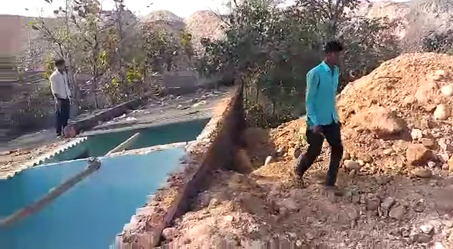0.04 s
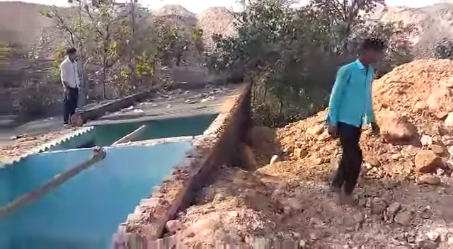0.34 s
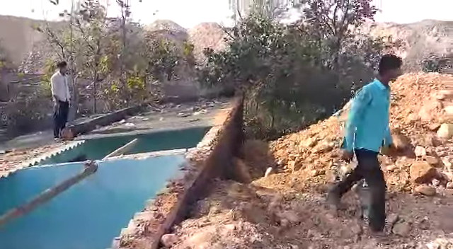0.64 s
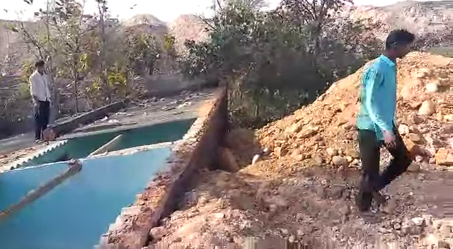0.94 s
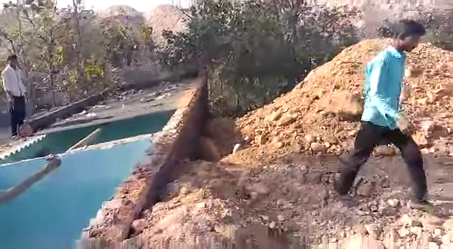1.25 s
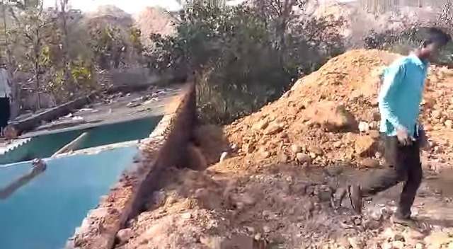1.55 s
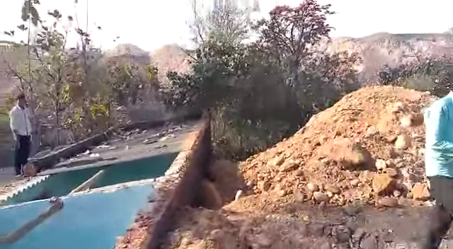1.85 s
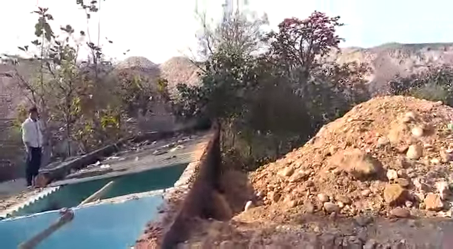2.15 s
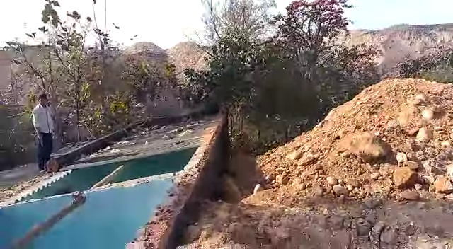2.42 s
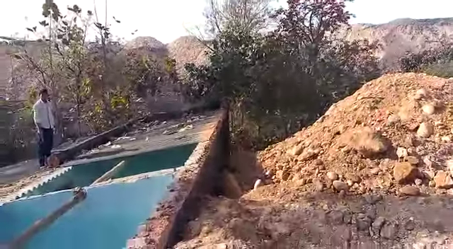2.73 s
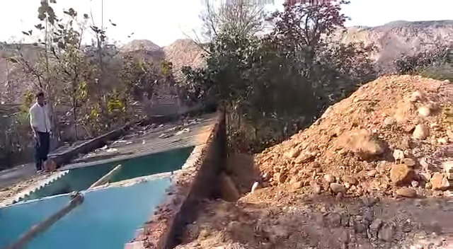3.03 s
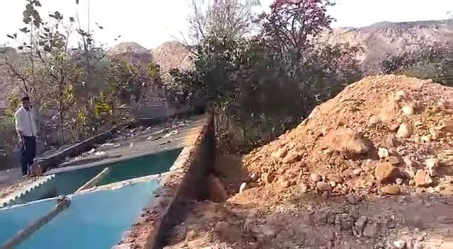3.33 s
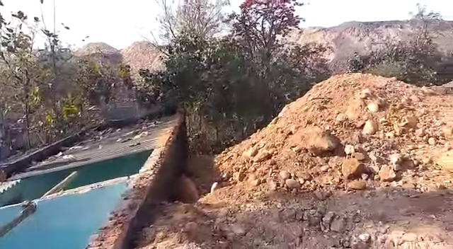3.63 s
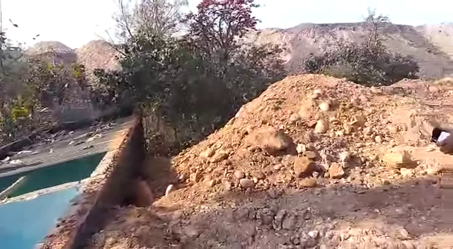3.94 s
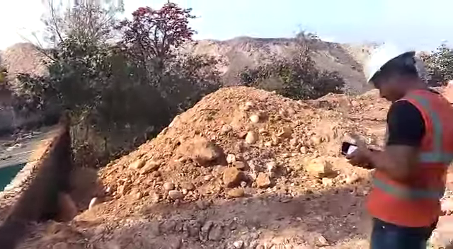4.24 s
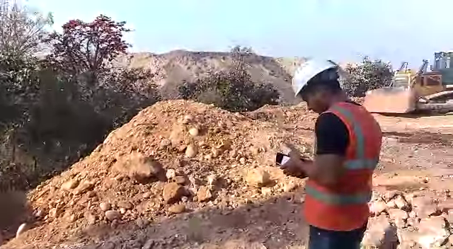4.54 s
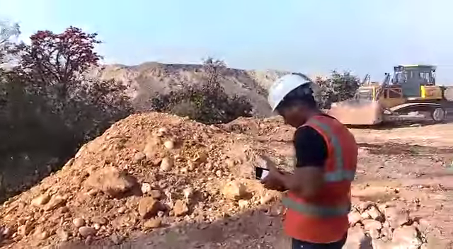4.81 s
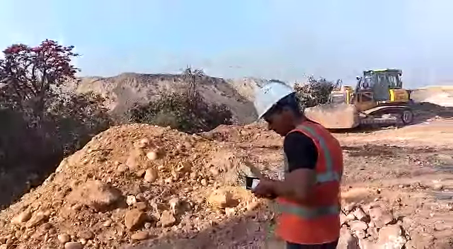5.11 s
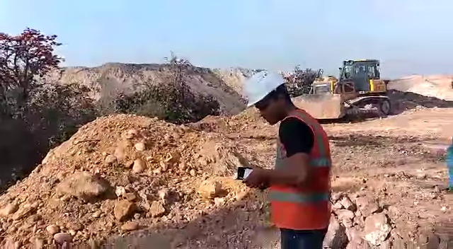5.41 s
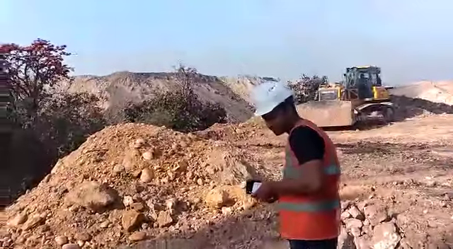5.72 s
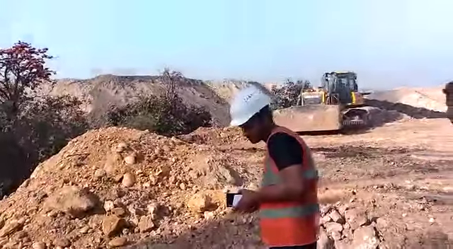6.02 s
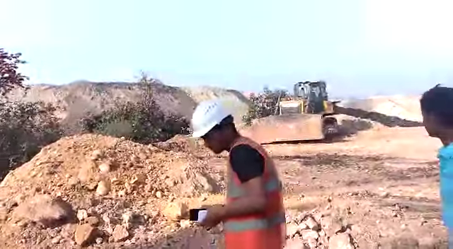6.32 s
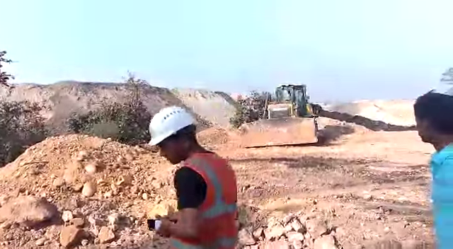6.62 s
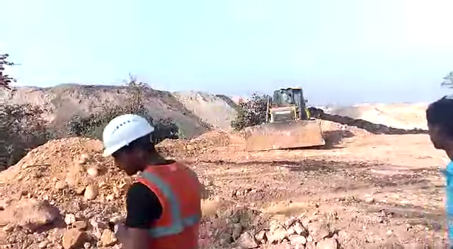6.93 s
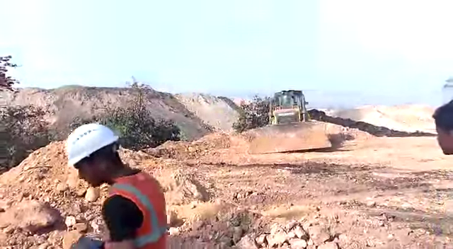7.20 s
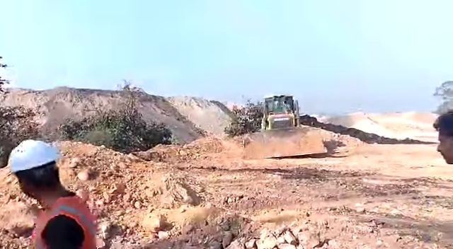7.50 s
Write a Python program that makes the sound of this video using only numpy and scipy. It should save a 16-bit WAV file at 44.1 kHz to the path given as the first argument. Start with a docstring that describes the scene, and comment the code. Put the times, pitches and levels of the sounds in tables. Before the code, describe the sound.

Dry steel tracks squeal and scrape over a distant bulldozer's low diesel rumble, which sags, rises with a thin whine, then slows.

```python
"""A bulldozer works some way off in an open mine. At first its diesel sags while dry track steel squeals
and scrapes. Near 3 s the engine revs up, the turbo whine climbs and soil crunches. From about 4 s the
engine labours, the air intake hisses and grit runs off the tracks; a hand-held phone with two unlike
microphones turns towards the machine, hearing it directly and off the ground. Around 6 s the steel
scrapes and chirps again, a breeze brushes the phone, and the engine slows."""
import sys
import numpy as np
from scipy import signal
from scipy.fft import rfft, irfft, next_fast_len
from scipy.io import wavfile
from scipy.ndimage import uniform_filter1d, map_coordinates

SR = 44100
rng = np.random.default_rng(int(sys.argv[2]) if len(sys.argv) > 2 else 0)


def put_to_file(sound):
    """Save the sound as 16-bit audio at rate SR, in the file named by the first command-line argument."""
    columns = np.atleast_2d(sound).T  # one column per channel
    safe = np.clip(columns, -1, 1)
    whole_steps = np.round(safe * 32767)
    wavfile.write(sys.argv[1], SR, whole_steps.astype(np.int16))


N = 342216
TIME = np.arange(N) / SR

# how often the cylinders fire: t/s, f/Hz
FIRING_RATE = [(0, 90.8), (.95, 80.4), (1.5, 76.1), (2.55, 77.8), (2.75, 85.6), (3, 100.7), (3.25, 102.4),
               (3.9, 99.53), (4.5, 94.7), (5.1, 89.08), (5.6, 89.73), (6, 88.8), (6.9, 81.2), (7.76, 81.9)]
# how hard the engine works: t/s, bass level/dB, midrange level/dB
ENGINE_LOAD = [(0.0, -42.5, -46.5), (0.69, -42.5, -48.5), (1.04, -40, -46), (2.29, -46, -49.5),
               (2.68, -46, -47.5), (2.94, -41, -42.5), (4.19, -37.5, -45.5), (4.65, -38.5, -45.5),
               (5.75, -39, -45.5), (6.33, -39, -48), (6.79, -43, -48), (7.76, -42.5, -43.5)]
# exhaust tones: multiple of the firing rate, level at low speed/dB, level at full speed/dB
EXHAUST_TONES = [(1, -4, -3), (2, -17.5, -7), (3, -17, -6), (6, -11.5, -10), (7, -25, -9.5),
                 (8, -18, -12.5), (9, -12.5, -13), (12, -10.5, -35)]
# where the exhaust pipe rings: f/Hz, width/Hz, boost/dB
PIPE_RINGS = [(554.5, 21, 1.5), (1064, 24, 4)]
# tone colour of the engine's rumble: f/Hz, level/dB
RUMBLE_COLOUR = [(12, -17), (25, -8), (45, -9), (65, -8), (100, -1), (135, -2.5), (165, -7.5), (210, -5.5),
                 (290, -8.5), (400, -6.5), (650, -43), (1200, -74)]
# tone colour of the clatter of burning fuel: f/Hz, level/dB
CLATTER_COLOUR = [(250, -3.5), (450, 2), (600, 1), (800, 3), (1100, -5), (1450, -13.5), (1950, -5.5),
                  (2400, -1), (2800, -12.5), (3300, -22), (4500, -6.5), (8000, -20.5)]
# a second drone that sinks, fades and returns: t/s, f/Hz, level/dB
LOW_DRONE = [(0, 151.7, -47), (.5, 148.3, -48), (1, 137.6, -53), (2.1, 126.6, -69.5), (2.8, 143.1, -47.5),
             (4.6, 140.5, -59.5), (5.9, 145.2, -53.5), (7.1, 130.4, -55.5)]
# gear hum as the machine gets moving: t/s, f/Hz, level/dB
GEAR_HUM = [(3.4, 209.5, -69), (3.9, 227.8, -47), (4.4, 263.7, -47), (4.9, 268.1, -41.5),
            (5.8, 254.3, -55.5), (7.3, 269.7, -62), (7.7, 277, -46.5)]
# tone colour of the air intake's hiss: f/Hz, level/dB
INTAKE_COLOUR = [(1000, -4), (2000, -2.5), (3400, -8), (4000, -5.5), (4600, -5.5), (5400, -7),
                 (6200, -12.5), (7300, -7.5), (8400, -0.5), (9100, 5), (10200, -3), (11500, -13.5),
                 (13000, -15.5), (14200, -24)]
# strength of that hiss: t/s, level/dB
INTAKE_LEVEL = [(0, -46), (2.3, -48), (3, -44.5), (4, -43.5), (4.4, -39.5), (5.3, -38), (6.15, -42.5),
                (6.6, -47.5), (7.76, -49.5)]
# pitch of the turbo's blades: t/s, f/Hz
TURBO_PITCH = [(0.3, 14000), (1.1, 11900), (1.6, 11100), (2.45, 9130), (2.7, 9970), (3.05, 12300),
               (3.7, 14690), (5.8, 14760), (6.65, 11790), (7, 10930), (7.35, 10750), (7.76, 11230)]
# whistle of the drive: t/s, f/Hz, level/dB
DRIVE_WHISTLE = [(3.1, 9495, -81), (3.45, 9800, -54), (3.8, 10360, -55), (4.3, 10830, -50),
                 (4.75, 10940, -41), (5.1, 10590, -45), (6, 9910, -43.5), (6.35, 8960, -53),
                 (6.6, 9090, -80)]
# track squeals: start t/s, length/s, f/Hz, glide/Hz, level/dB, fade/dB, octave level/dB, roughness 0-1
TRACK_SQUEALS = [(-.02, 0.19, 4570, -5, -24.5, 3, -34.5, 0.46),
                 (0.233, 0.054, 4578, 9, -19.5, -1.5, -28.5, 0.36),
                 (0.293, 0.12, 4602, -33, -20.5, 7.5, -33, 0.6),
                 (0.486, 0.053, 4650, 14, -25, 5.5, -40.5, 0.2),
                 (0.882, 0.069, 4760, -15, -33.5, 6.5, -48, 0.27),
                 (1.011, 0.11, 4613, 28, -25.5, 13.5, -31.5, 0.9),
                 (1.201, 0.073, 4610, 8, -15.5, 16.5, -31, 0.4),
                 (1.284, 0.043, 4595, -27, -27, 7, -39, 0.8),
                 (1.384, 0.037, 4534, 50, -21.5, 13, -22.5, 0.9),
                 (1.422, 0.045, 4586, -48, -24.5, 7.5, -38, 0.86),
                 (1.501, 0.023, 4530, 22, -34, -1, -45, 0.77), (1.559, 0.018, 4604, 3, -32, -1, -38, 0.8),
                 (1.587, 0.077, 4604, 1, -18, 16.5, -35.5, 0.6),
                 (1.779, 0.034, 4596, 14, -34.5, -14, -32, 0.4), (1.821, 0.11, 4580, -44, -30, 1.5, -33, 0)]
# short squeaks of steel: start t/s, length/s, f/Hz, level/dB, place of the peak 0-1
STEEL_CHIRPS = [(.35, 0.25, 2497, -46.5, 0.26), (1.515, 0.42, 2490, -43, 0.31),
                (1.833, 0.064, 4660, -36, .45), (5.464, 0.11, 5364, -27.5, 0.73),
                (5.469, 0.069, 3634, -40, 0.6), (5.805, 0.125, 4995, -31, 0.2),
                (5.816, 0.14, 4620, -46, .3), (5.784, .1, 4100, -41, .45), (5.926, 0.036, 5003, -39, .35),
                (6.19, 0.079, 7260, -48, 0.47), (6.197, .035, 3450, -46, .4), (6.47, 0.046, 3260, -50, .4),
                (6.568, .04, 3290, -51, .4)]
# gritty scrapes: middle t/s, level/dB, half length/s
GRIT_SCRAPES = [(0.093, -36.5, .018), (0.33, -39, 0.034), (0.549, -37.5, 0.024), (0.73, -34.5, 0.028),
                (0.92, -35.5, 0.034), (1.096, -33, 0.018), (1.257, -45, 0.033), (1.405, -49, 0.02),
                (3.583, -35.5, 0.015), (3.706, -41, 0.019), (5.228, -23.5, 0.0083), (5.395, -28, 0.013),
                (5.43, -31, 0.014), (5.48, -23.5, 0.023), (5.615, -29, 0.011), (5.938, -29.5, 0.007),
                (6.163, -31.5, 0.011), (6.48, -40, 0.0053), (7.49, -44.5, 0.052)]
# stones snapping against steel: t/s, f/Hz, level/dB
STONE_SNAPS = [(.688, 8300, -47), (0.753, 9500, -30), (0.795, 11500, -39), (.945, 9600, -30),
               (1.539, 6860, -39), (3.573, 8300, -34.5), (5.724, 10340, -38), (6.476, 8190, -38),
               (6.583, 13500, -38)]
# where the track steel rings: f/Hz, width/Hz, level/dB
STEEL_RINGS = [(5730, 27, -4.5), (7120, 61, -15.5), (8550, 22, 9), (8650, 61, 4), (8600, 49, -3),
               (9300, 52, 3), (9630, 28, 8), (9900, 83, -1.5), (12900, 130, -29)]
# crunches and knocks in the soil: peak t/s, level/dB, rise/s, decay/s, centre f/Hz
SOIL_CRUNCHES = [(1.222, -33.5, 0.0083, 0.0081, 2290), (2.87, -38, 0.03, 0.077, 1970),
                 (3.752, -27.5, 0.016, 0.039, 3100), (4.32, -39.5, 0.017, 0.014, 2620),
                 (5.972, -36.5, 0.0014, 0.013, 4020), (6.316, -32.5, 0.0009, 0.0025, 4980)]
# tone colour of grit running off the tracks: f/Hz, level/dB
FALLING_GRIT_COLOUR = [(3000, -16), (6000, 3), (8500, -6), (11000, 9), (14000, -5)]
# strength of that grit: t/s, level/dB
FALLING_GRIT_LEVEL = [(3.7, -68), (4.4, -44), (5.4, -48), (6.3, -57), (7, -74), (7.76, -68)]
# breeze on the microphones: t/s, level/dB
BREEZE_LEVEL = [(0, -72), (2.3, -55), (3, -57), (4.3, -78), (5.4, -64), (6.2, -39.5), (6.7, -50.5),
                (7.76, -56)]
# the phone's turn: t/s, right lag/samples, ground echo delay/ms, right hiss boost/dB, echo level/dB
PHONE_TURN = [(0, 19.7, 2.3, 7.5, -12.5), (2.3, 19.3, 1.19, 6, -3), (3.8, 17.6, 1.203, 6.5, -6.5),
              (4.25, 15.1, 1.44, 2.5, -5), (4.75, 10.23, 1.66, 0.5, -0.5), (5.5, 10, 1.85, 1, -1.5),
              (6.25, 5.2, 1.702, -1, -4.5), (6.75, 3.86, 1.795, 3.5, -4), (7.76, 4.22, 1.79, 1.5, -5.5)]
# tone colour of the right microphone against the left: f/Hz, level/dB
RIGHT_MIC_COLOUR = [(100, 0.5), (700, -0.5), (1200, 3.5), (1800, -6), (2400, -9), (3300, -5), (4500, -7.5),
                    (6000, -2), (7700, -4), (9200, -14.5), (11000, -16), (14000, -13.5)]

SCRAPE_HZ = 9100  # centre of the noise of grit on steel


def diesel(knock=0.27, note_db=-4, rumble_db=-3.5, clatter_db=3):
    """Exhaust, pump and hums sound over rumble and clatter that pulse each time a cylinder fires."""
    hz, = curves(FIRING_RATE)
    bass_db, middle_db = curves(ENGINE_LOAD)
    phase = phase_of(hz * (1 + 0.00349 * wander(9)))
    pump_tone, growl = pump(hz, phase)
    note = exhaust(hz, phase, bass_db + note_db)
    tones = note + growl + np.sqrt(2) * (pump_tone + hum(LOW_DRONE) + hum(GEAR_HUM))
    pulse = np.exp(knock * np.cos(phase))
    rumble = machine_noise(RUMBLE_COLOUR, scatter_db=-24, pulse=pulse) * gain(bass_db + rumble_db)
    clatter = machine_noise(CLATTER_COLOUR, scatter_db=-13, pulse=pulse)
    clatter *= gain(middle_db + clatter_db + 1.22 * wander(14))
    return ground_echo(two_mics(tones) + rumble + exhaust_pipe(clatter))


def exhaust(hz, phase, note_db, flutter_db=2, lumpy_db=-17):
    """The firings make a note that brightens with speed; six unequal cylinders add weak tones between."""
    speed = np.clip((hz - hz.min()) / np.ptp(hz), 0, 1)
    pickup = np.maximum(np.gradient(uniform_filter1d(hz, size=16000)), 0)
    surge_db = 6 * pickup / pickup.max()  # low tones swell while the engine speeds up
    note = 0
    for k, slow_db, fast_db in EXHAUST_TONES:
        pipe_db = sum(db * np.exp(-((k * hz - centre) / width) ** 2) for centre, width, db in PIPE_RINGS)
        level_db = slow_db + (fast_db - slow_db) * speed + pipe_db + surge_db / k
        note += gain(level_db + flutter_db * wander(10)) * np.sin(k * (phase + 0.033 * wander(22)))
    lumps = sum(wander(6) * np.sin(k / 6 * phase + rng.uniform(0, 2 * np.pi))
                for k in range(3, 18) if k % 6)
    return np.sqrt(2) * gain(note_db) * (note + gain(lumpy_db) * lumps)


def exhaust_pipe(x, ring_db=-4):
    """The noise of burning fuel makes the exhaust pipe ring."""
    return x + gain(ring_db) * sum(band(x, hz, width) for hz, width, _ in PIPE_RINGS)


def pump(firing_hz, phase, fade_db_per_hz=0.9, growl_db=-6):
    """The hydraulic pump's tone and rough growl, both fading as the engine slows."""
    strokes_per_firing = 10 / 3
    db = -44 - fade_db_per_hz * (firing_hz.max() - firing_hz) + 2 * wander(8.2)
    tone = gain(db) * np.sin(phase * strokes_per_firing)
    return tone, whine(firing_hz * strokes_per_firing, db + growl_db, width_hz=140)


def hum(table, flutter_db=2, wobble=0.00801):
    """A low tone that wavers in level and pitch."""
    hz, db = curves(table)
    return gain(db + flutter_db * wander(9)) * np.sin(phase_of(hz * (1 + wobble * wander(12))))


def intake():
    """Air rushing into the engine hisses, with a fine grain in it."""
    hiss = machine_noise(INTAKE_COLOUR, scatter_db=-0.5)
    hiss += gain(-3.5) * unit(colour(grit(), INTAKE_COLOUR))
    _, _, right_db, _ = curves(PHONE_TURN)
    return hiss * gain(curves(INTAKE_LEVEL)[0] + 1.4 * wander(21.055)) * gain(np.outer([0, 1], right_db))


def turbo(loss_db_per_octave=33, facing_db=7):
    """The blades' whine fades as its pitch climbs, and grows as the phone turns to the machine."""
    hz, = curves(TURBO_PITCH)
    lag = curves(PHONE_TURN)[0]
    facing = 1 - lag / lag.max()
    db = -50.5 - loss_db_per_octave * np.log2(hz / hz.min()) + facing_db * facing
    return whine(hz, db, width_hz=800)


def whistle(core_db=-8, halo_db=-3):
    """The drive whistles: a thin wavering core inside a narrow hiss."""
    hz, db = curves(DRIVE_WHISTLE)
    return whine(hz, db + core_db, width_hz=190) + whine(hz, db + halo_db, width_hz=660)


def whine(hz, db, width_hz, flutter_db=3):
    """A tone blurred into a narrow hiss, like that of blades in churning air."""
    phase = phase_of(hz)
    level = gain(db + flutter_db * wander(13))
    return level * (wander(width_hz) * np.sin(phase) + wander(width_hz) * np.cos(phase))


def squeals(attack_s=0.0033, release_s=0.016, arch_hz=22, jitter=0.0039, right_db=-5):
    """Dry steel sticks and slips: the pitch arches with pressure, and grit makes it judder and hiss."""
    out = np.zeros(N)
    tremble, chatter_db, flutter_db = wander(400), 2.8 * wander(90), 3 * wander(60.68)
    rasp = gain(-27) * unit(band(rng.standard_normal(N), 4800, 590))
    judder = 0.16 * wander(930)
    friction_colour = [(3000, -19), (5200, 12), (7500, -7), (10000, -12), (14000, -6)]
    friction = gain(-30) * unit(colour(grit()[0], friction_colour))
    for start, length, hz, glide_hz, db, fade_db, octave_db, rough in TRACK_SQUEALS:
        on = (TIME >= start - 10 * attack_s) & (TIME < start + length + 10 * release_s)
        age = TIME[on] - start
        progress = np.clip(age / length, 0, 1)
        pressure = np.sin(np.pi * progress)
        grip = np.exp(-np.maximum(age - length, 0) / release_s) / (1 + np.exp(2 - age / attack_s))
        pitch = hz + glide_hz * (progress - .5) + arch_hz * (pressure - 2 / np.pi)
        phase = phase_of(pitch * (1 + rough * jitter * tremble[on]))
        tone = (1 + rough * judder[on]) * np.sin(phase) + rough * rasp[on] + friction[on]
        tone *= gain(db - fade_db * progress)
        # a harder bite brings out tones at two and three times the pitch
        bite = gain(octave_db - fade_db * (progress - .5) / 2 + flutter_db[on]) * (1 + pressure) / 2
        overtones = bite * (1 + judder[on]) * (np.sin(2 * phase) + gain(-17) * np.sin(3 * phase))
        out[on] += np.sqrt(2) * grip * gain(rough * chatter_db[on]) * (tone + overtones)
    return two_mics(out) * gain([[0], [right_db]])


def chirps(octave_db=-16, flutter_db=1.95, rasp_db=-17, jitter=0.0014):
    """The steel gives thin, clean squeaks that swell and fade."""
    out = np.zeros(N)
    tremble = wander(60)
    flutter = gain(flutter_db * wander(35)) * (1 + gain(rasp_db) * wander(1000))
    for start, length, hz, db, peak in STEEL_CHIRPS:
        on = (TIME > start) & (TIME < start + length)
        phase = phase_of(hz * (1 + jitter * tremble[on]))
        progress = (TIME[on] - start) / length
        swell = np.sin(np.pi / 2 * np.interp(progress, [0, peak, 1], [0, 1, 0]))
        tone = np.sin(phase) + gain(octave_db) * np.sin(2 * phase)
        out[on] += np.sqrt(2) * gain(db) * swell * flutter[on] * tone
    return two_mics(out)


def scrapes(grains_per_s=440, max_grains=80, size_range_db=10):
    """Grit grinds on steel: short swells of rubbing and snapping grains make it ring."""
    grains = colour(grit(), [(2500, 6), (5500, -2.5), (8000, 1), (13000, 1)])
    chance = rng.random((len(GRIT_SCRAPES), max_grains, 3))
    out = np.zeros((2, N))
    for (middle, db, half), draws in zip(GRIT_SCRAPES, chance):
        on = np.abs(TIME - middle) < 4 * half
        swell = np.exp(-((TIME[on] - middle) / half) ** 2)
        rub = unit(band(grains[:, on], SCRAPE_HZ, width_hz=4200))
        out[:, on] += gain(db - 0.5) * swell * unit(rub + gain(-1) * steel(grains[:, on]))
        for when, size, which in draws[:int(4 * half * grains_per_s)]:
            offset = 4 * (when - .5)  # in half lengths from the middle
            hz, _, ring_db = STEEL_RINGS[int(which * len(STEEL_RINGS))]
            level = gain(db + 1 + ring_db / 2 + size_range_db * (size - 1)) * np.exp(-offset ** 2)
            add(out, middle + half * offset, level * ping(hz, ring_s=0.0029))
    return out


def stones(body_db=-2, body_s=0.015):
    """Larger stones snap one at a time and set all the steel ringing."""
    out = np.zeros((2, N))
    age = TIME[:2000]
    for start, hz, db in STONE_SNAPS:
        body = gain(body_db) * np.exp(-age / body_s) * steel(rng.standard_normal((2, len(age))))
        add(out, start, gain(db) * (ping(hz, ring_s=0.01, crack_db=0, crack_s=0.0046) + body))
    return out


def ping(hz, ring_s, crack_db=-9, crack_s=0.0013):
    """One grain snaps: a tiny bright crack and a brief ring of the steel."""
    age = TIME[:2000]
    ring = np.exp(-age / ring_s) * np.sin(2 * np.pi * (hz * age + rng.random((2, 1))))
    crack = unit(band(rng.standard_normal((2, len(age))), SCRAPE_HZ, width_hz=3500))
    return np.sqrt(2) * ring + gain(crack_db) * np.exp(-age / crack_s) * crack


def steel(x):
    """Shaken track steel rings at its own pitches."""
    return unit(sum(gain(db) * band(x, hz, width) for hz, width, db in STEEL_RINGS))


def crunches(thud_db=-9, thud_hz=720, thud_width_hz=450):
    """Dry clods give way: a quick swell of crackle over a dull thud."""
    grains = colour(grit(), [(200, 1), (600, 2), (2500, 8.2), (7000, 2.3), (13000, 1)])
    thud = gain(thud_db) * unit(band(band(grit(), thud_hz, thud_width_hz), thud_hz, thud_width_hz))
    out = np.zeros((2, N))
    for peak, db, rise, decay, hz in SOIL_CRUNCHES:
        on = np.abs(TIME - peak) < .3
        age = TIME[on] - peak
        swell = np.exp(np.minimum(age / rise, -age / decay))
        crackle = unit(band(grains[:, on], hz, width_hz=4500))
        out[:, on] += gain(db) * swell * (crackle + thud[:, on])
    return out


def falling_grit(flutter_db=1):
    """Fine grit runs off the tracks once the machine is moving."""
    db, = curves(FALLING_GRIT_LEVEL)
    return unit(colour(grit(), FALLING_GRIT_COLOUR)) * gain(db + flutter_db * wander(20))


def breeze(gust_db=1.5, right_db=3):
    """Light air flutters on each microphone separately."""
    wind_colour = [(8, -12), (30, 1), (60, -10), (120, -3), (300, -33)]
    flutter = unit(colour(rng.standard_normal((2, N)), wind_colour))
    return flutter * gain(curves(BREEZE_LEVEL)[0] + gust_db * wander(6.6)) * gain([[0], [right_db]])


def ground_echo(x, shift_rad=0.83):
    """Soft soil returns a duller echo with its waves shifted; the delay changes as the phone moves."""
    _, echo_ms, _, echo_db = curves(PHONE_TURN)
    dull = colour(x, [(100, -4.5), (1700, 1), (2600, 0), (5000, -17)])
    shifted = np.real(signal.hilbert(dull, next_fast_len(N))[:, :N] * np.exp(1j * shift_rad))
    echo = np.array([delay(side, echo_ms * SR / 1000) for side in shifted])
    return (x + gain(echo_db) * echo) / np.sqrt(1 + gain(2 * echo_db))


def heap_echoes(x, echo_db=-24, fade_60_db_s=0.6):
    """Heaps of dug earth and a wall give sounds a faint, short tail."""
    age = TIME[:SR // 2]
    tail = rng.standard_normal((2, len(age))) * gain(-60 * age / fade_60_db_s) * (age > .012)
    return x + gain(echo_db) * signal.fftconvolve(x, unit(tail) / np.sqrt(len(age)), axes=1)[:, :N]


def machine_noise(tone_colour, scatter_db, pulse=1):
    """Noise from the machine: part comes straight, part is scattered by the heaps."""
    direct = two_mics(pulse * rng.standard_normal(N))
    return unit(colour(direct + gain(scatter_db) * rng.standard_normal((2, N)), tone_colour))


def two_mics(x):
    """Sound from the machine reaches the left microphone first."""
    return np.array([x, delay(x, curves(PHONE_TURN)[0])])


def grit(spread_db=3, grain_samples=16):
    """Noise made of grains of unequal size, separate for left and right."""
    sizes = gain(spread_db * np.clip(rng.standard_normal((2, N // grain_samples + 1)), -2, 2))
    return rng.standard_normal((2, N)) * np.repeat(sizes, grain_samples, axis=1)[:, :N]


def wander(per_s):
    """A smooth random curve of typical size 1, with about per_s new values a second."""
    step = max(int(SR / per_s), 2)
    points = rng.standard_normal(N // step + 2)
    joined = np.interp(np.arange(N) / step, np.arange(len(points)), points)
    return unit(uniform_filter1d(joined, step // 2))


def colour(x, points):
    """Shape lows and highs by a list of (f/Hz, level/dB) points."""
    hz, db = np.transpose(points)
    size = next_fast_len(N)
    f = np.maximum(np.arange(size // 2 + 1) * SR / size, 1)
    return irfft(rfft(x, size) * gain(np.interp(np.log(f), np.log(hz), db)), size)[..., :N]


def band(x, hz, width_hz):
    """Keep the part of a sound near one pitch."""
    return signal.lfilter(*signal.iirpeak(hz, hz / width_hz, fs=SR), x)


def curves(table):
    """Join a table's rows by straight lines in time: one curve for each column after the first."""
    times, *columns = np.transpose(table)
    return [np.interp(TIME, times, column) for column in columns]


def delay(x, samples):
    """Make a sound late by a changing number of samples."""
    return map_coordinates(x, [np.arange(N) - samples], order=3)


def phase_of(hz):
    """How far a wave has turned so far, in radians."""
    return 2 * np.pi * np.cumsum(hz) / SR


def add(out, start_s, sound):
    """Mix in a short sound at a given time."""
    start = max(int(start_s * SR), 0)
    part = out[..., start:start + sound.shape[-1]]
    part += sound[..., :part.shape[-1]]


def gain(db):
    """Turn decibels into a multiplier."""
    return 10 ** (np.asarray(db) / 20)


def unit(x):
    """Scale to an average power of 1."""
    return x / np.sqrt(np.mean(x ** 2))


def scene():
    """The machine and the small sounds around it."""
    engine = diesel() + intake()
    # the whines arrive by many paths, so each microphone hears its own flutter
    whines = np.array([turbo() + whistle() for mic in range(2)])
    background = falling_grit() + breeze()
    steel_and_soil = squeals() + chirps() + crunches() + stones() + scrapes()
    return engine + whines + background + heap_echoes(steel_and_soil)


def record(dry, top_hz=14250):
    """The right microphone has its own tone colour; the phone cuts the highest treble."""
    coloured = np.array([dry[0], colour(dry[1], RIGHT_MIC_COLOUR)])
    return signal.sosfilt(signal.ellip(10, .2, 80, top_hz, fs=SR, output="sos"), coloured)


dry = scene()
out = record(dry)
put_to_file(out)
```